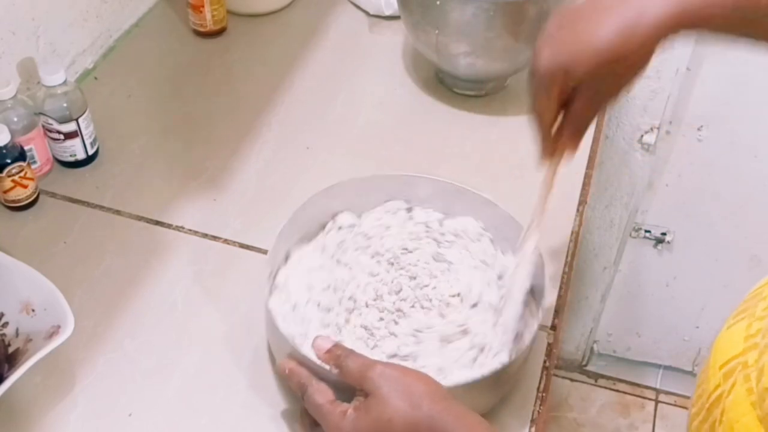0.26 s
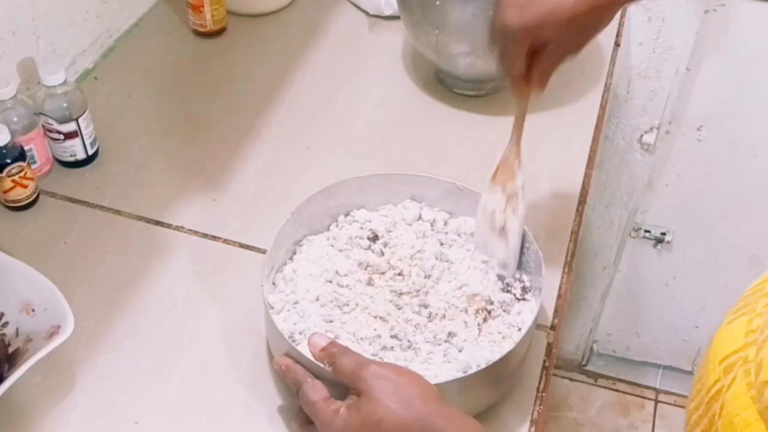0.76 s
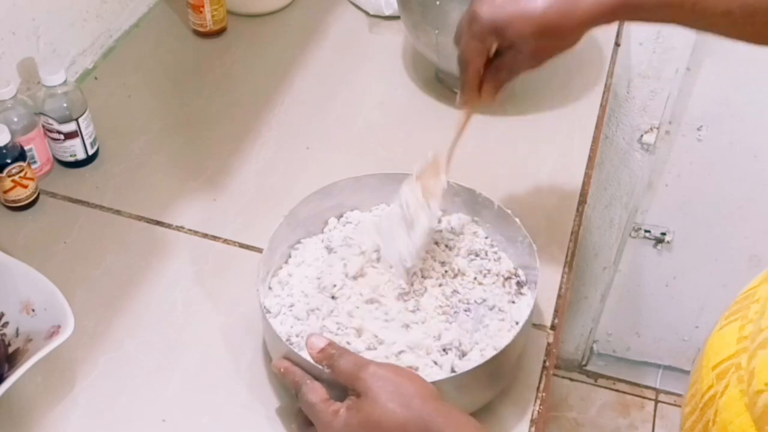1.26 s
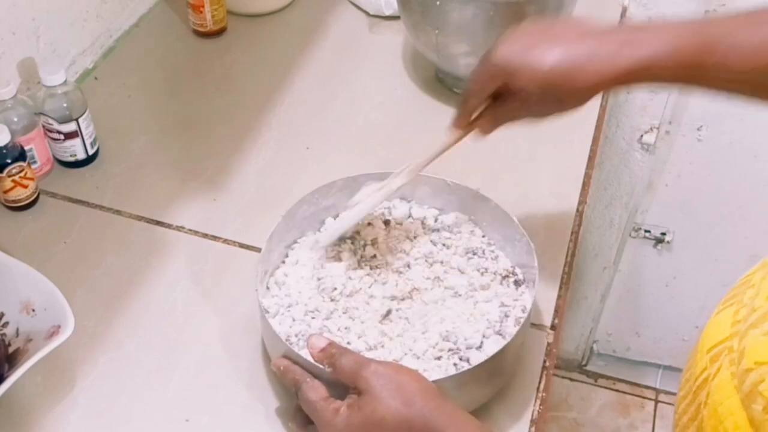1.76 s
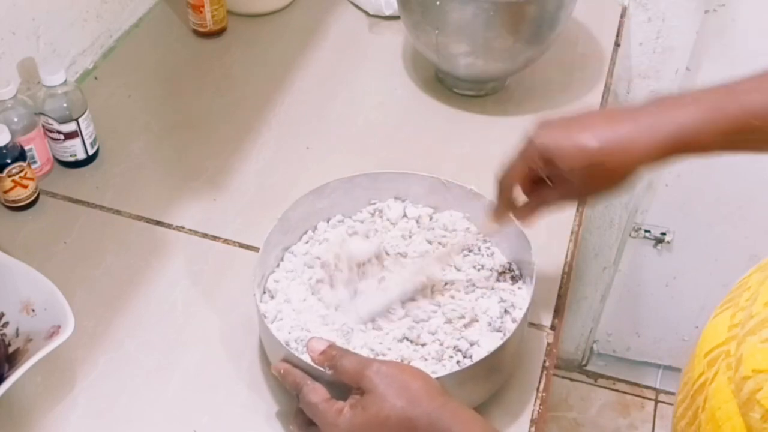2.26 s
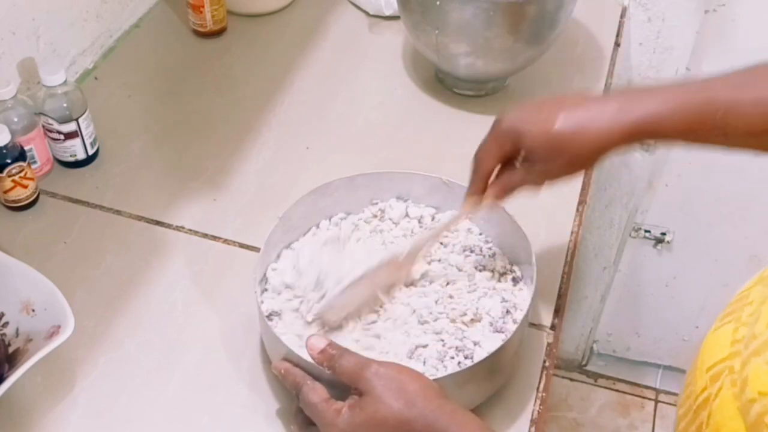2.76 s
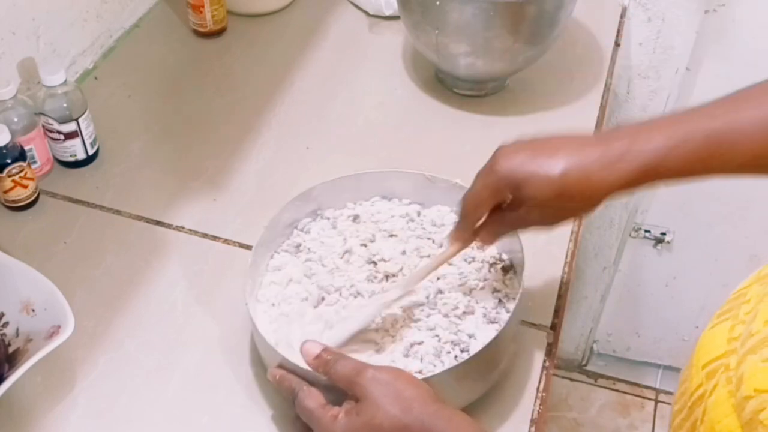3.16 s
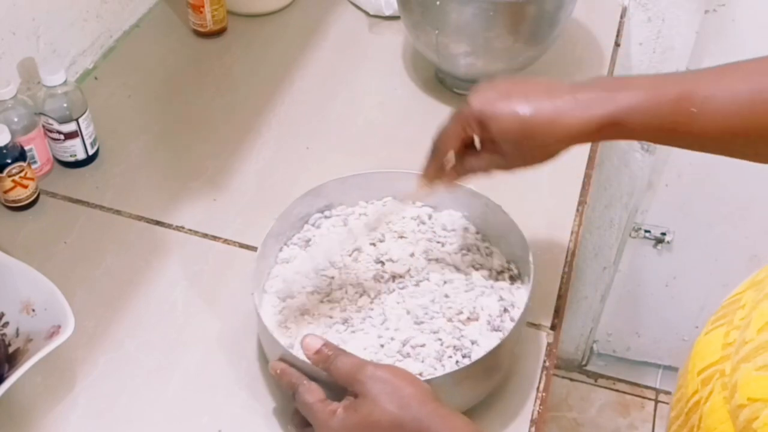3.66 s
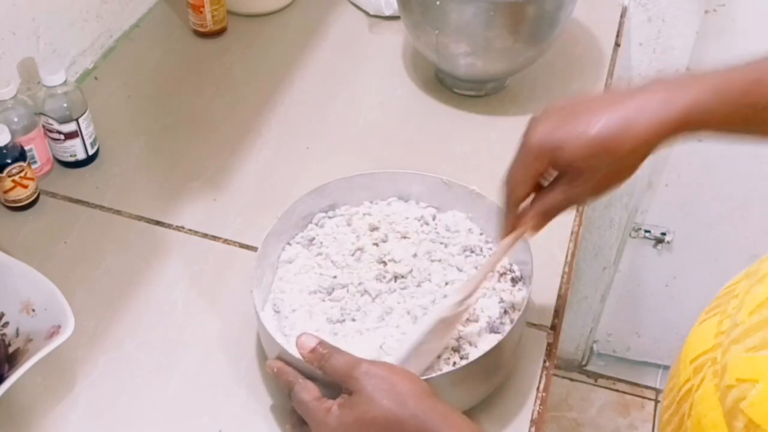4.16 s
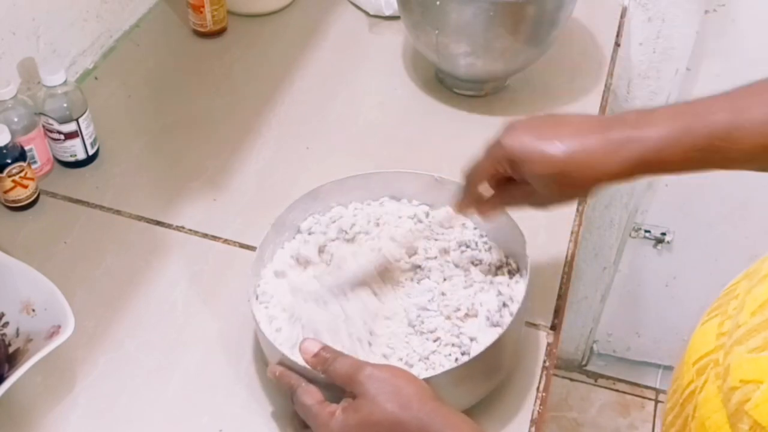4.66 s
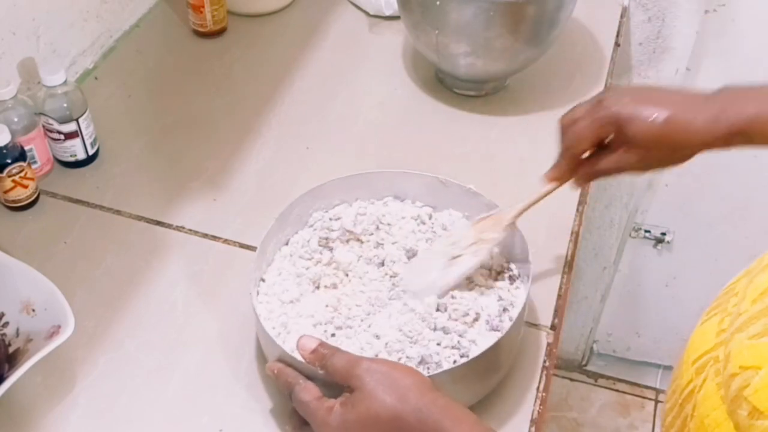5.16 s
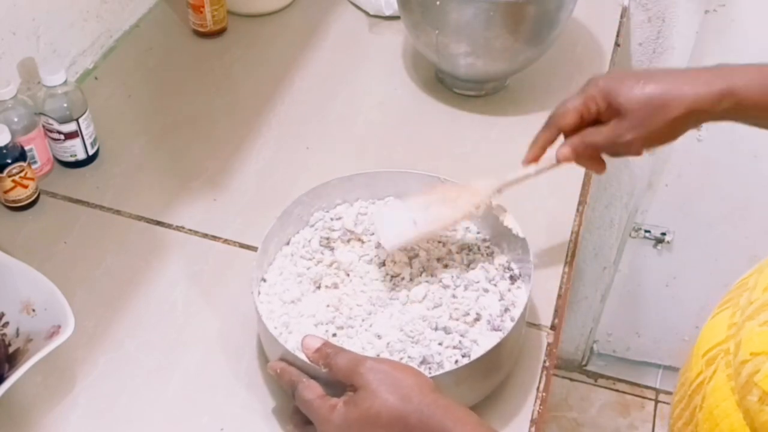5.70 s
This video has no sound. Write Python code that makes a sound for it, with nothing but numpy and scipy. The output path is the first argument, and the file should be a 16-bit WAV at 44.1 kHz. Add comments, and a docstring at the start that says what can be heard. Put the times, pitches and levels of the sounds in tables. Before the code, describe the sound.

Gritty swishes of flour being stirred in a metal pan, with woody-metal clunks and scrapes, over quiet room air and faint crickets.

```python
"""A wooden spoon stirs a dry flour mixture in a metal pan on a tiled kitchen counter, heard in stereo.
From the start, filtered random clicks make the hiss of grains, over noise-built room air and traffic,
a sine motor hum and crickets: narrow noise bands trill, pulsed sines chirp. Within 0.3 s damped
pan modes rub and knock under the spoon, and do so again up to the end. From about 1.1 to 2.9 s a drone
of two beating sines passes. Sparse reflections follow the pan sounds throughout."""
import sys
import numpy as np
from scipy import signal
from scipy.fft import rfft, irfft, next_fast_len
from scipy.io import wavfile
from scipy.ndimage import uniform_filter1d

SR = 44100
rng = np.random.default_rng(int(sys.argv[2]) if len(sys.argv) > 2 else 0)


def linear_from_db(decibels):
    """Turn decibels (scalar or array-like) into linear amplitude factors; 0 gives 1."""
    return 10 ** (np.asarray(decibels, float) / 20)


def to_wav(s):
    """Save 16-bit WAV."""
    ch = np.atleast_2d(s).T  # columns
    pcm = np.round(np.clip(ch, -1, 1) * 32767)  # PCM
    wavfile.write(sys.argv[1], SR, pcm.astype(np.int16))


N = 261513  # samples

# Modes of the loaded pan. Each row: frequency in Hz, level in dB, t60 in seconds before contact damping.
PAN_MODES = [(440, -15, .16), (505, -12, .18), (588, -6, .2), (640, -9, .18), (690, -1, .22),
             (740, -5, .18), (790, -3, .2), (862, -1, .22), (922, 0, .18), (1000, -3, .18), (1100, -5, .15),
             (1210, -3, .15), (1276, -3, .15), (1366, -4, .12), (1445, -3, .12), (1590, 3, .15),
             (1710, 1, .12), (1825, 0, .12), (1930, 0, .14), (2100, -5, .1), (2300, -10, .1)]


def evened(x):
    """Normalization: scales a signal to unit rms."""
    return x / np.sqrt(np.mean(x ** 2) + 1e-20)


def read(points, hz):
    """Linear interpolation of a table over logarithmic frequency, held flat beyond its ends."""
    f, value = np.transpose(points)
    return np.interp(np.log(hz + 1), np.log(f + 1), value, left=value[0], right=value[-1])


def colour(x, points):
    """Linear filtering: the spectrum is multiplied by a tabled magnitude response."""
    size = next_fast_len(x.shape[-1])
    response = linear_from_db(read(points, np.fft.rfftfreq(size, 1 / SR)))
    return irfft(rfft(x, size) * response, size)[..., :x.shape[-1]]


def patchy(x, patch_db):
    """Spectro-temporal modulation: short, narrow patches of the spectrum swell and sink at random."""
    z = signal.stft(x, nperseg=512, noverlap=384)[2]
    field = uniform_filter1d(rng.standard_normal(z.shape), size=2, axis=-2)
    field = uniform_filter1d(field, size=14, axis=-1)
    return signal.istft(z * linear_from_db(patch_db * evened(field)), nperseg=512, noverlap=384)[1][..., :N]


def grains(per_s, spread_db):
    """Shot noise: random impacts of either sign, a few of them large."""
    size = linear_from_db(spread_db * np.minimum(rng.exponential(1, N), 4)) * rng.standard_normal(N)
    return evened(size * (rng.random(N) < per_s / SR))


def stroke_gain(rows, column, fall_db_per_s, lag_s=0):
    """Incoherent addition: pushes run up, tire while held and die away; their powers add."""
    run_up_db, run_up_bend = -44, 1.51  # level at the start of a run-up; how it rounds into full speed
    sag_db_per_s, settle_s = 12.5, 0.033  # the held push tires, then rounds off into the fall
    t = np.arange(0, N + 32, 32) / SR
    power = 0
    for row in rows:
        s, run_up, hold = row[0] + lag_s, row[1] + 0.0011, row[2]
        early = np.maximum(s - t, 0) / run_up
        late = np.maximum(t - s - hold, 0)
        db = run_up_db * early ** run_up_bend
        db -= sag_db_per_s * np.clip(t - s, 0, hold)
        db -= fall_db_per_s * (np.hypot(late, settle_s) - settle_s)
        power = power + linear_from_db(np.maximum(row[column] + db, -200)) ** 2
    return np.interp(np.arange(N) / SR, t, np.sqrt(power))


def ring_of(modes, shares_db, phases):
    """Modal superposition: a body's answer to one tap is a sum of decaying sines."""
    hz, db, t60 = np.array(modes).T[:, :, None]
    t = np.arange(SR // 2) / SR
    level = linear_from_db(db + shares_db[:, None] - 60 * t / t60)
    return (level * np.sin(2 * np.pi * (hz * t + phases[:, None]))).sum(0)


def flour():
    """Granular noise: independent fine grains and coarser lumps for left, right and both sides."""
    # Pushes through the flour. Each row: time of full speed, run-up and hold in seconds,
    # fine grain and coarse lump levels in dB before the mix.
    strokes = [(-.05, .05, 0, -47, -54.5), (.268, 0.097, 0.1, -37, -43.5), (.637, 0.014, 0.072, -39, -43),
               (.83, 0.15, 0.014, -36, -46.5), (.9, 0.092, .12, -42.5, -50.5),
               (1.44, 0.16, 0.048, -36, -43.5), (1.85, .12, .04, -35, -43), (2.2, 0.064, 0.038, -37, -44.5),
               (2.66, 0.12, 0.058, -37, -43.5), (2.93, 0.064, 0, -68.5, -87),
               (3.09, 0.12, 0.018, -38.5, -48), (3.42, .08, 0.036, -38, -63), (3.675, 0.078, 0, -39.5, -53),
               (3.77, 0.13, 0.0073, -41, -51.5), (4.07, 0.017, 0, -68, -82),
               (4.2, .14, 0.049, -38.5, -47.5), (4.61, 0.12, 0.033, -33.5, -42),
               (5.06, 0.055, 0.14, -34, -48.5), (5.18, 0.18, 0.12, -35, -49),
               (5.73, 0.0095, .25, -34.5, -44)]
    # Spectra of fine grains and lumps. Each row: frequency in Hz, response in dB.
    fine_spectrum = [(1940, -29), (3300, -24.5), (3640, -11.5), (4550, -2.5), (4990, -5.5), (5870, -4),
                     (7840, -1), (8880, 0.5), (9920, 1.5), (11700, -6), (15100, -11), (15800, -9)]
    coarse_spectrum = [(700, -56), (1200, -12.5), (2300, -5), (3000, -5.5), (3600, -6.5), (4600, -20)]
    fall_db_per_s = 318
    fine = stroke_gain(strokes, column=3, fall_db_per_s=fall_db_per_s)
    # lumps move later than the fine grains
    coarse = stroke_gain(strokes, column=4, fall_db_per_s=fall_db_per_s, lag_s=0.0027)
    out = np.zeros((3, N))
    for side in out:
        side += fine * evened(colour(grains(16000, 3.4), fine_spectrum))
        side += coarse * evened(colour(grains(2000, 3.2), coarse_spectrum))
    return patchy(out, patch_db=3.5)


def kitchen(x):
    """Reverberation: sparse reflections die treble first; three stereo patterns trade weight cyclically."""
    # Decay of the reflections. Each row: frequency in Hz, t60 in seconds.
    decay = [(150, 0.23), (700, 0.31), (2000, 0.16), (6000, 0.13), (14000, 0.06)]
    out = np.zeros((2, N))
    for turn in range(3):
        taps = np.zeros((2, SR // 2))
        # one reflection at random in every 20 samples
        at = np.arange(100, SR // 2 - 20, 20) + rng.integers(0, 20, (2, (SR // 2 - 101) // 20))
        np.put_along_axis(taps, at, rng.choice([-1., 1.], at.shape), 1)
        hz, t, z = signal.stft(taps, SR, nperseg=256)
        fading = linear_from_db(-60 * t / read(decay, hz)[:, None])
        tail = signal.istft(z * fading, SR, nperseg=256)[1]
        tail /= np.linalg.norm(tail[0])
        cycles = .9 * np.arange(N) / SR + turn / 3
        share = np.sqrt(2 / 3) * np.cos(2 * np.pi * cycles)
        out += signal.fftconvolve((x * share)[None], tail, axes=1)[:, :N]
    return out


def at_microphones(x):
    """Propagation delay: the right microphone is nearer to the pan, so the left hears it later."""
    left_lag = 43  # samples
    return np.array([np.roll(x, left_lag), x])


def air():
    """Partial coherence: room air over distant traffic, alike on both sides only in the bass."""
    # Each row: frequency in Hz, left-right correlation.
    likeness = [(60, 0.49), (130, 0.53), (290, 0), (640, 0)]
    # Traffic levels. Each row: time in seconds, rumble and murmur in dB before the gusts.
    traffic = [(0, -64, -70.5), (.25, -47.5, -57), (.8, -57, -66), (1.6, -47, -61.5), (2.45, -43, -64.5),
               (3, -54.5, -64), (3.7, -53, -59), (4.1, -47, -64.5), (4.5, -53, -60.5), (5.3, -48, -63.5),
               (5.93, -63, -63)]
    # Spectra of rumble, murmur and room air. Each row: frequency in Hz, response in dB.
    rumble_spectrum = [(12, -17), (24, 1), (36, -10.5), (54, -20), (61, 9.5), (70, 1.5), (85, -14),
                       (120, -19), (200, -78)]
    murmur_spectrum = [(65, -3), (110, -4.5), (200, -3), (330, -8), (420, -3.5), (560, -19.5), (800, -46.5)]
    air_spectrum = [(400, -37), (620, 4), (1200, 2), (2800, -4.5), (9500, -6), (10800, -10), (11800, -24),
                    (15800, -27)]
    a, b = rfft(rng.standard_normal((2, N)))
    same = np.clip(read(likeness, np.fft.rfftfreq(N, 1 / SR)), -1, 1)
    pair = irfft([a, same * a + np.sqrt(1 - same ** 2) * b], N)
    # slow random gusts, 2 dB rms
    gusts_db = 2 * evened(colour(rng.standard_normal((2, N)), [(1, 0), (3, 0), (7, -60)]))
    s, *levels_db = np.transpose(traffic)
    t = np.arange(N) / SR
    rumble, murmur = (linear_from_db(np.interp(t, s, db) + gust_db) for db, gust_db in zip(levels_db, gusts_db))
    soft = murmur * evened(colour(pair, murmur_spectrum))
    soft += linear_from_db(-69) * evened(colour(pair, air_spectrum))
    return patchy(soft, patch_db=4.5) + rumble * evened(colour(pair, rumble_spectrum))


def hums():
    """Interference: a motor hum dips, then slowly grows; a passing drone's two engine tones beat."""
    # Motor hum. Each row: time in seconds, level in dB before wavering and the mix.
    hum_levels = [(0, -43.5), (1.2, -48), (3, -45), (4.5, -41.5), (5.93, -40)]
    # Passing drone. Each row: time in seconds, lower and upper tone levels in dB before the mix.
    drone_levels = [(1.099, -70, -58), (1.35, -46.5, -61), (1.56, -34, -68), (1.69, -38.5, -66),
                    (1.776, -47, -70), (1.93, -32.5, -48), (2.1, -34.5, -44), (2.4, -32.5, -41),
                    (2.55, -46, -49), (2.9, -80, -74)]
    t = np.arange(N) / SR
    waver_db = 0.91 * evened(colour(rng.standard_normal(N), [(.5, -4), (3, -90)]))
    hum_gain = linear_from_db(np.interp(t, *np.transpose(hum_levels)) + waver_db)
    hum = hum_gain * np.sin(2 * np.pi * 49.2 * t)
    in_step_s = 2.232  # both drone tones are in phase here
    s, *levels_db = np.transpose(drone_levels)
    drone = 0
    for hz, db in zip((56.8, 63.2), levels_db):
        gain = linear_from_db(np.interp(t, s, db, left=-90, right=-90))
        drone = drone + gain * np.sin(2 * np.pi * hz * (t - in_step_s))
    # slightly stronger on the right
    return np.sqrt(2) * (drone + hum) * linear_from_db(np.array([[-.7], [.7]]))


def crickets():
    """Amplitude modulation: narrow noise bands waver as trills; pulsed tones chirp, stronger on the left."""
    # Far trills. Each row: frequency in Hz, level in dB before swelling, half-width at -12 dB in Hz.
    trills = [(6990, -77, 25), (5960, -88, 30), (7780, -90, 30), (7390, -86, 30), (9590, -92, 40)]
    # Chirps. Each row: start in seconds, high and low cricket levels in dB before pulsing and panning.
    chirps = [(0.069, -70, -79), (.5, -110.5, -105.5), (1.268, -74, -82), (2.47, -68, -82),
              (4.898, -65, -73), (5.498, -67.5, -101)]
    out = np.zeros((2, N))
    for hz, db, width in trills:
        line = [(hz - 3 * width, -60), (hz - width, -12), (hz, 0), (hz + width, -12), (hz + 3 * width, -60)]
        swell_db = 3.5 * evened(colour(rng.standard_normal(N), [(2, 0), (5, -90)]))
        out += linear_from_db(db + swell_db) * evened(colour(rng.standard_normal((2, N)), line))
    t = np.arange(int(.1 * SR)) / SR
    pulses = signal.windows.tukey(len(t), .6) * (.75 - 0.32 * np.cos(2 * np.pi * 48 * t))
    for s, high_db, low_db in chirps:
        flutter_db = 4 * evened(uniform_filter1d(rng.standard_normal((2, len(t))), size=300))
        chirp = linear_from_db(high_db) * np.sin(2 * np.pi * 3780 * t)
        chirp += linear_from_db(low_db) * np.sin(2 * np.pi * 3420 * t)
        start = round(s * SR)
        out[:, start:start + len(t)] += pulses * chirp * linear_from_db(flutter_db + np.array([[6], [0]]))
    return out


def rubbing():
    """Stick-slip excitation: spoon and lumps slip along the metal; slips excite varied mixes of modes."""
    # The spoon dragging along the wall. Each row: time of firm contact, run-up and hold in seconds,
    # low and high pan mode levels in dB before the mix.
    rubs = [(.22, 0.056, .18, -59.5, -59), (.636, 0.016, 0, -52, -64), (.78, .1, 0.011, -59.5, -52.5),
            (.84, .08, .18, -68.5, -56), (1.49, .1, 0.0086, -61.5, -51), (1.85, 0.098, 0.059, -82, -73),
            (2.2, 0.037, 0.00019, -64.5, -72), (2.66, 0.12, 0.062, -63.5, -51),
            (2.72, 0.056, 0, -54.5, -63), (3.09, 0.11, 0.0011, -64.5, -57), (3.375, 0.027, 0.046, -59, -62),
            (3.64, 0.06, 0.023, -59, -59), (3.77, 0.067, 0, -55.5, -72), (4.24, 0.16, 0, -71, -54.5),
            (4.64, 0.1, 0.031, -58, -54.5), (5.045, 0.044, .14, -46, -47), (5.2, 0.12, 0.095, -45, -43.5),
            (5.76, .03, .2, -49.5, -44)]
    fall_db_per_s = 387
    out = np.zeros((2, N))
    high = np.array(PAN_MODES)[:, 0] > 1050
    for shares_db, phases in zip(*rng.standard_normal((2, 8, len(PAN_MODES)))):
        for part, muted in zip(out, (high, ~high)):
            # pressure and shifting flour detune the wall
            bent = np.array(PAN_MODES) * [rng.uniform(.94, 1.06), 1, 1]
            ring = ring_of(bent, 3 * shares_db - 100 * muted, phases)
            t = np.arange(len(ring)) / SR
            ring *= linear_from_db(-700 * t) * (1 - np.exp(-t / .002))  # the pressing spoon damps the wall
            part += signal.oaconvolve(grains(200, 7.1), ring / np.linalg.norm(ring))[:N]
    low_rub = stroke_gain(rubs, column=3, fall_db_per_s=fall_db_per_s) * evened(out[0])
    high_rub = stroke_gain(rubs, column=4, fall_db_per_s=fall_db_per_s) * evened(out[1])
    return patchy(low_rub + high_rub, patch_db=3.5)


def knocks():
    """Impact excitation: a blow rings modes near its pitch, thuds the counter and throws a crack of grains."""
    # Spoon against the pan. Each row: start in seconds, ring peak in dB before the mix, favoured pitch in Hz,
    # crack and thud levels in dB against the ring's peak, dullness in dB per squared octave.
    blows = [(0.258, -30, 1460, 2.5, -40, 10), (0.273, -12.5, 680, -23, -31, 8.5),
             (0.287, -51, 760, -29.5, -21, 9.2), (0.326, -29.5, 580, -8, -36, 7.8),
             (0.635, -12.5, 1030, -6.5, -33, 1.1), (0.658, -18.5, 810, -5.5, -38, 5.9),
             (0.666, -20.5, 886, -6.5, -33, 6.8), (1.059, -28.5, 950, -33, -30, 22),
             (1.112, -39.5, 820, -27, -24, 13), (2.195, -52, 1120, -2, -27, 10),
             (3.38, -26, 740, -42, -15, 8.4), (3.646, -19.5, 796, -16, -19, 21),
             (5.033, -20, 950, -16, -30.5, 7.2), (5.058, -44, 860, 2, -36, 9.1),
             (5.277, -26.5, 900, -26, -39, 40), (5.727, -8, 970, -19, -25, 3.5),
             (5.743, -32, 1260, -1, -39, 3.7)]
    # Modes of the counter. Each row: frequency in Hz, level in dB, t60 in seconds.
    counter_modes = [(65, -12, 0.22), (133.3, 6.5, 0.053), (185, 0, .12), (276, 3.5, 0.073),
                     (323.6, 3, 0.098), (379.4, 0, 0.075)]
    # Spectrum of the crack. Each row: frequency in Hz, response in dB.
    crack_spectrum = [(1470, -14.5), (2500, 0), (2850, -6.5), (4710, 2), (7140, -0.5), (9870, -6),
                      (15800, -71)]
    out = np.zeros(N + SR)
    t = np.arange(SR // 2) / SR
    for s, db, hz, crack_db, thud_db, dull_db in blows:
        chance_db = 2.5 * rng.standard_normal(len(PAN_MODES))
        octaves = np.log2(np.array(PAN_MODES)[:, 0] / hz)
        ring = ring_of(PAN_MODES, chance_db - dull_db * octaves ** 2, rng.random(len(PAN_MODES)))
        # the wall swings widely under the spoon, then the flour damps it;
        # the hand on the rim shortens the remaining ring by 60 dB per second
        ring *= 0.036 * linear_from_db(-60 * t) + np.exp(-(t / 0.0057) ** 2)
        ring *= 1 - np.exp(-(t / 0.0011) ** 2)  # soft wood: the contact builds up
        thud_shares_db = 3 * rng.standard_normal(len(counter_modes))
        thud = ring_of(counter_modes, thud_shares_db, np.zeros(len(counter_modes)))
        thud *= 1 - np.exp(-t / 0.0043)
        crack = evened(colour(rng.standard_normal(len(t)), crack_spectrum))
        crack *= linear_from_db(-900 * t) * (1 - np.exp(-t / 0.0014))
        blow = ring / abs(ring).max()
        blow += linear_from_db(thud_db) * thud / abs(thud).max()
        blow += linear_from_db(crack_db) * crack
        out[round(s * SR):][:len(t)] += linear_from_db(db) * blow
    return out[:N]


def scene():
    """Superposition: pan sounds, direct and reflected, add to the night background."""
    # Balance of the pan sounds. Each row: frequency in Hz, left minus right in dB.
    sides = [(60, 38), (130, -7), (290, -2.5), (640, -5), (1410, 0), (3100, -1), (6820, 2), (15000, -11)]
    left, right, both = flour()
    metal = rubbing() + knocks()
    near = linear_from_db(-5.0) * np.array([left, right])
    near += at_microphones(linear_from_db(-10.5) * both + linear_from_db(-2.5) * metal)
    near += kitchen(linear_from_db(-5.5) * both + linear_from_db(-4.5) * metal)
    # each side takes half of the difference
    near = [colour(x, [(f, side * db / 2) for f, db in sides]) for x, side in zip(near, (1, -1))]
    return np.array(near) * np.sqrt(2) + air() + hums() + crickets()


def roll_off(x):
    """The treble ends steeply here."""
    return signal.sosfilt(signal.butter(12, 16970, fs=SR, output="sos"), x)


def record(dry):
    """Band limitation: a linear-phase low-pass ends the treble near 15.9 kHz."""
    edge_hz = 15880
    low_pass = signal.firwin(511, edge_hz, window=("kaiser", 9), fs=SR)
    limited = signal.oaconvolve(dry, low_pass[None], "same")
    return roll_off(limited)


dry = scene()
out = record(dry)
to_wav(out)
```